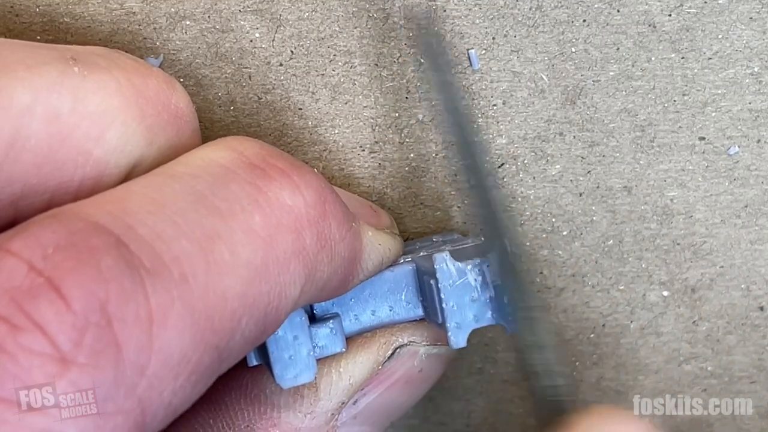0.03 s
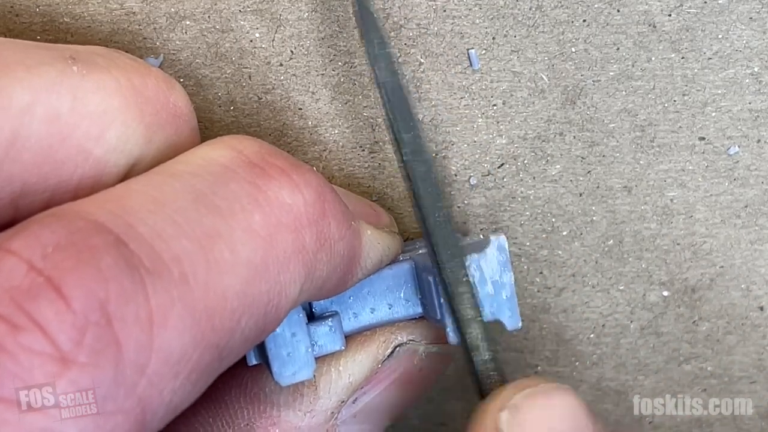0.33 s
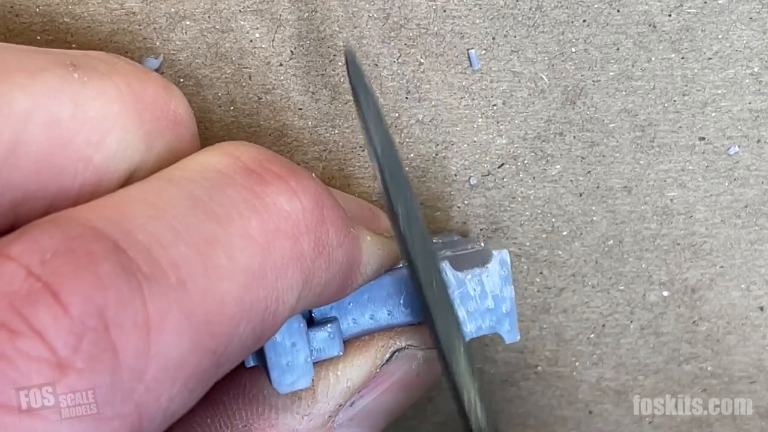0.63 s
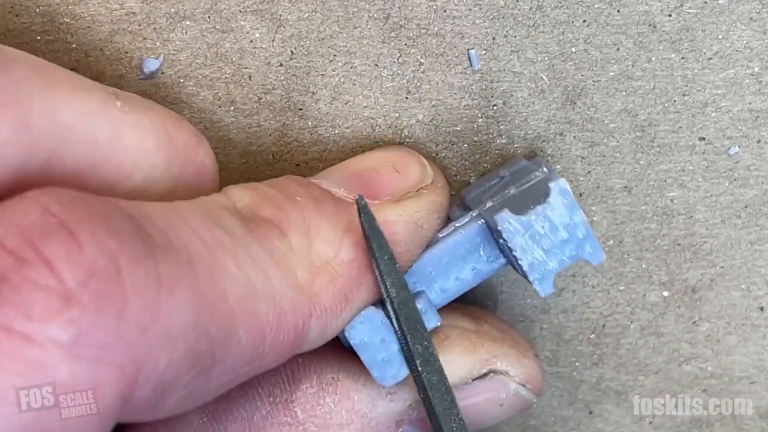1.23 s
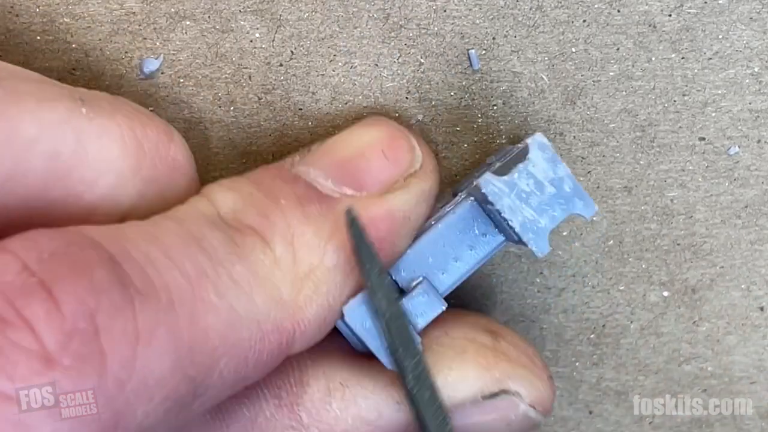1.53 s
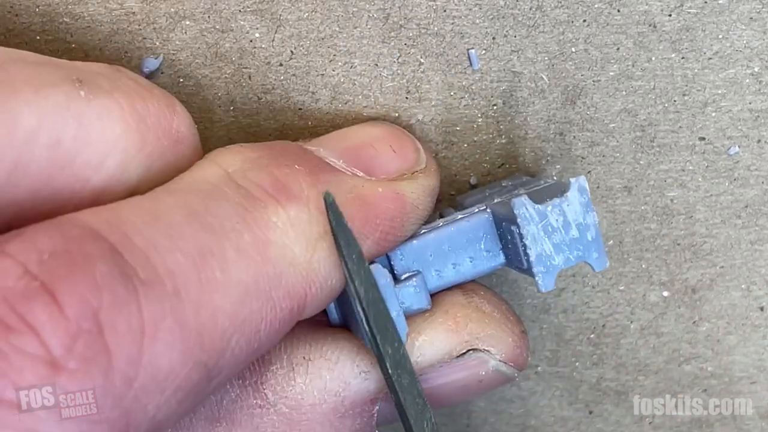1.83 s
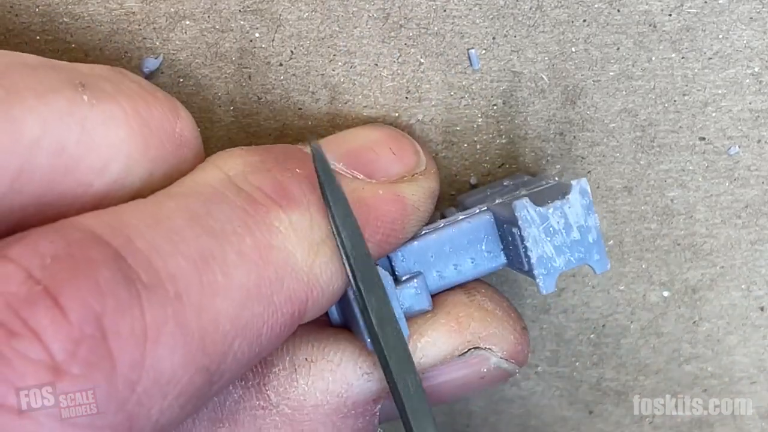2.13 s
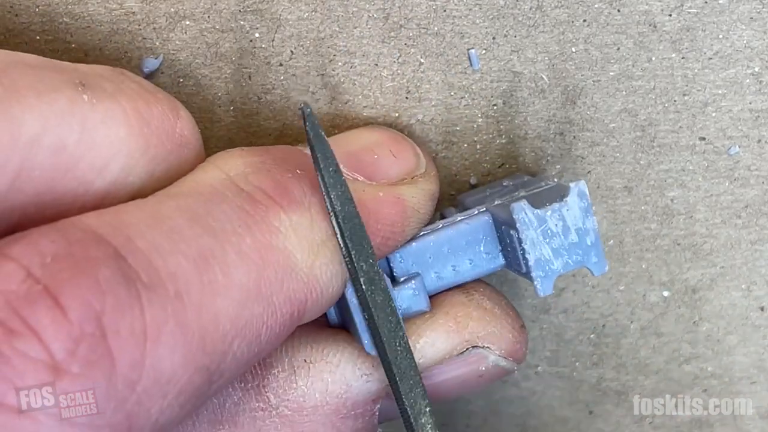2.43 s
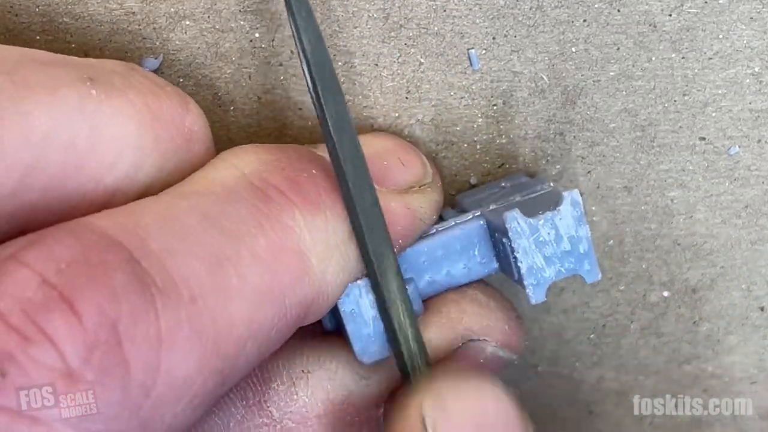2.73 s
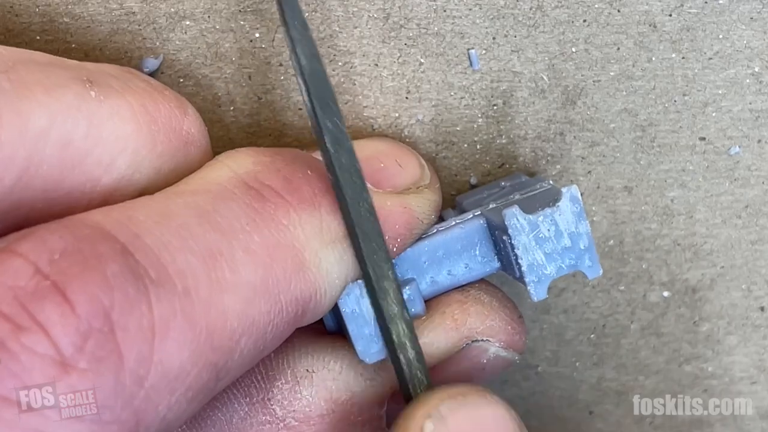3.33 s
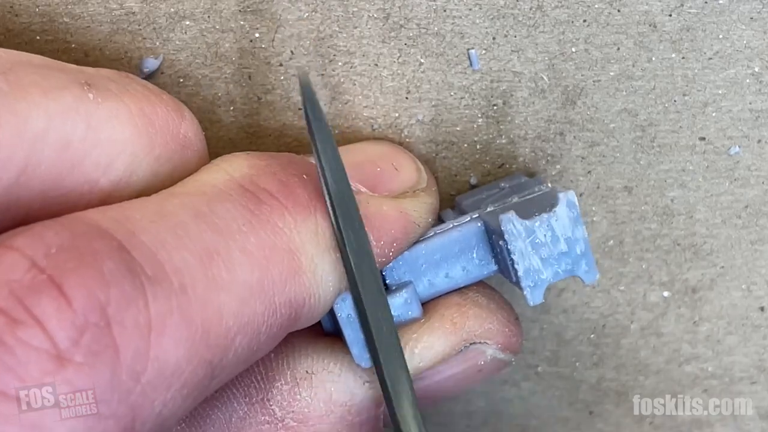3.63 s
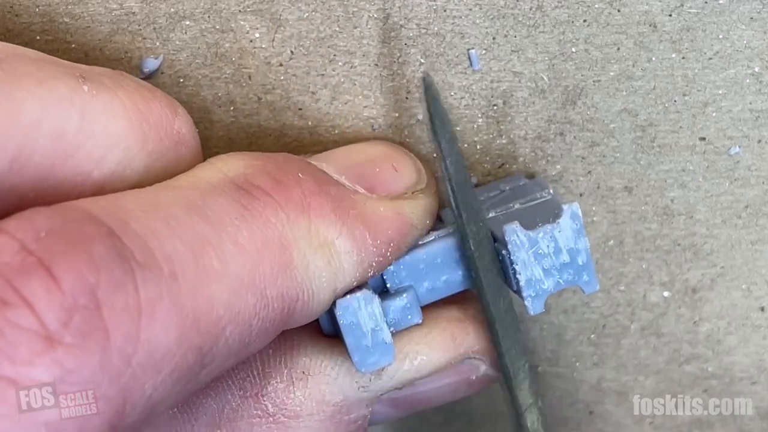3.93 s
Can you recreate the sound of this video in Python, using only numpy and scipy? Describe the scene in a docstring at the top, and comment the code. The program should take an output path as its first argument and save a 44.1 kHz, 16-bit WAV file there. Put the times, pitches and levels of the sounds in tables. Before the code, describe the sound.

A small metal file scrapes a plastic model part in short, uneven strokes.

```python
"""A small steel file scrapes to and fro over a plastic model part pinched between fingers.
Its teeth pick at the edge: a bright rasp, the hollow ring of part and file, a soft thud in the hand.
The file knocks as it lands or snags, and on some strokes it sticks and slips in a short croak.
Heard in a quiet room, close to a stereo microphone, with a low rumble from the fingers underneath."""
import sys
import numpy as np
from scipy import signal
from scipy.fft import rfft, irfft
from scipy.io import wavfile
from scipy.ndimage import uniform_filter1d

SR = 44100
rng = np.random.default_rng(int(sys.argv[2]) if len(sys.argv) > 2 else 0)


def pcm_store(signal):
    """Save signal as 16-bit PCM."""
    levels = np.round(np.clip(np.atleast_2d(signal), -1, 1) * 32767)
    wavfile.write(sys.argv[1], SR, levels.astype(np.int16).T)


N = 176400
TIME = np.arange(N) / SR


def from_db(db):
    """Decibels to gain."""
    return 10 ** (np.asarray(db) / 20)


def unit_rms(x):
    """Scale to unit power."""
    return x / np.sqrt(np.mean(x ** 2) + 1e-20)


def drift(rate_hz):
    """A smooth random wander with a spread of about 1."""
    pole = np.exp(-2 * np.pi * rate_hz / SR)
    return unit_rms(signal.lfilter([1], [1, -2 * pole, pole * pole], rng.standard_normal(N + SR))[SR:])


def response(colour, size=8192):
    """Minimum-phase impulse response of unit energy: a colour sets tone, not loudness."""
    hz, db = np.transpose(colour)
    grid_hz = np.maximum(np.arange(size // 2 + 1) * SR / size, 1)
    cepstrum = irfft(np.log(from_db(np.interp(np.log(grid_hz), np.log(hz), db))))
    cepstrum[1:size // 2] *= 2
    cepstrum[size // 2 + 1:] = 0
    impulse = irfft(np.exp(rfft(cepstrum)))
    return impulse / np.linalg.norm(impulse)


def through(force, impulse):
    """Pass a force through an impulse response."""
    return signal.fftconvolve(force, impulse)[:N]


def contact(start, end, attack_s=0.0018, release_s=0.01):
    """Envelope of a touch: the file eases in, stays and lifts off."""
    onset = (1 + np.tanh((TIME - start) / (2 * attack_s))) / 2
    return onset * np.exp(-np.maximum(TIME - end, 0) / release_s)


def pulses(rate_hz, jitter):
    """Unit clicks at a changing rate, each gap a little uneven."""
    cycles = np.cumsum(rate_hz) / SR
    marks = np.cumsum(np.exp(jitter * rng.standard_normal(N // 4)))
    clicks = np.zeros(N)
    clicks[np.searchsorted(cycles, marks[marks < cycles[-1]])] = 1
    return clicks


# Background of the quiet room: frequency_hz, level_db
FLOOR_COLOUR = [(20, -6.5), (150, -5), (330, -22), (1500, -33.5), (3000, -42), (9000, -37.5),
                (13000, -71.5)]

def noise_floor(level_db=-65.5):
    """Steady low noise with a trace of hiss."""
    return from_db(level_db) * through(rng.standard_normal(N), response(FLOOR_COLOUR))


# Flesh of the hand, heard from close by: frequency_hz, level_db
RUMBLE_COLOUR = [(20, -34.5), (32, -23.5), (50, -1.5), (72, -8), (100, -13.5), (1000, -69)]

def finger_rumble(force, shake_db=-4.5, hold_s=0.021, rest_db=-71.5):
    """The fingers rumble faintly at rest and go on shaking after each push."""
    pole = np.exp(-1 / (hold_s * SR))
    shake = np.sqrt(signal.lfilter([1 - pole], [1, -pole], force ** 2))
    level = from_db(shake_db) * shake + from_db(rest_db)
    return through(rng.standard_normal(N) * level, response(RUMBLE_COLOUR))


# The file lands or snags: start_s, rasp_db, body_db, hand_db
FILE_KNOCKS = [(0.045, -20.5, -5, -5.5), (0.301, -19, -21, -10), (.327, -25, -37, -12),
               (0.358, -24, -17, -17), (0.646, -25, -6.5, -13), (.693, -23, -12, -2),
               (.758, -14.5, -7.5, -5), (1.199, -34.5, -28, -20.5), (1.756, -38.5, -25.5, -16.5),
               (2.277, -31, -14, -9), (2.292, -53.5, -42, -8.5), (2.512, -38, -15.5, -22.5),
               (3.931, -23.5, -17.5, -20.5), (3.961, -45, -17, -16.5)]

def knocks(crunch_s=0.005, crunch_share=0.98):
    """A sharp blow, then the edge briefly crumbles; gives the forces for rasp, body and hand."""
    forces = np.zeros((3, N + SR))
    t = TIME[:SR // 20]
    for start, *levels_db in FILE_KNOCKS:
        crunch = rng.standard_normal(len(t)) * np.exp(-t / crunch_s)
        blow = crunch_share * crunch / np.linalg.norm(crunch)
        blow[0] += 1
        at = int(start * SR)
        forces[:, at:at + len(t)] += from_db(levels_db)[:, None] * blow / np.linalg.norm(blow)
    return forces[:, :N]


# Steel teeth on the plastic edge, close up: frequency_hz, level_db
RASP_COLOUR = [(500, -14.5), (1500, 1.5), (2400, 1.5), (2900, -5.5), (4300, 0.5), (5400, -3.5), (7900, 3.5),
               (9100, 3.5), (10100, 8), (10800, -5), (11700, -26.5), (13000, -49), (16000, -66.5)]

def rasp(force, sizzle_hz=11000, sizzle_db=-12.5, hard_bite_db=-35):
    """A bright scrape; the harder the teeth bite, the more high sizzle it gains."""
    bite = np.sqrt(np.abs(uniform_filter1d(force ** 2, size=300))) / from_db(hard_bite_db)
    band = signal.butter(2, [sizzle_hz / 1.12, sizzle_hz * 1.12], "band", fs=SR, output="sos")
    sizzle = signal.sosfilt(np.vstack([band, band]), force * np.tanh(bite))
    return through(force, response(RASP_COLOUR)) + from_db(sizzle_db) * sizzle


# Clack of the plastic body: frequency_hz, level_db
BODY_COLOUR = [(100, -19), (300, -0.5), (450, 3), (545, -5), (650, -0.5), (900, -4.5), (1050, -8),
               (2200, -12), (2800, -21.5), (5000, -22), (12000, -57)]
# Modes of part and file: pitch_hz, lift_db, width_hz
PART_MODES = [(680.2, 6, 12), (744, 0.5, 4.1), (895, 5.5, 11), (1273, 9.5, 18), (1559, 9.5, 75),
              (1825, 4.5, 65)]

def part_response():
    """Impulse response of a dead plastic clack, lifted at the modes of part and file, which ring on."""
    clack = response(BODY_COLOUR)
    for pitch_hz, lift_db, width_hz in PART_MODES:
        ring = signal.lfilter(*signal.iirpeak(pitch_hz, pitch_hz / width_hz, fs=SR), clack)
        clack = clack + (from_db(lift_db) - 1) * ring
    return clack / np.linalg.norm(clack)


# The hand that pinches the part: frequency_hz, level_db
HAND_COLOUR = [(20, -26), (52, -11), (90, -17), (145, 0.5), (175, -1), (202, 6), (238, -9.5), (305, 1.5),
               (420, -14), (3000, -79.5)]

def hand_thud(force):
    """The hand takes each push of the file with a soft, low thud."""
    return through(force, response(HAND_COLOUR))


def arch(start, crest, end, swell_db, fade_db=8):
    """Pressure swells to a rounded crest and falls away; a negative swell starts above the crest."""
    to_crest = np.interp(TIME, [start, crest], [1, 0])
    past_crest = np.interp(TIME, [crest, end], [0, 1])
    return from_db(-swell_db * to_crest ** 2 - fade_db * past_crest ** 2)


# Passes of the file: start_s, crest_s, end_s, rasp_db, body_db, hand_db, swell_db
FILE_STROKES = [(0.07, 0.187, 0.17, -63.5, -46.5, -43, 12.5), (0.229, 0.297, 0.31, -43.5, -36.5, -36, 6.5),
                (0.354, .385, 0.43, -51, -46, -49.5, 3), (0.474, 0.552, 0.54, -44, -42, -41.5, 1),
                (0.582, 0.648, 0.65, -42, -39, -42.5, 8.5), (0.694, 0.734, 0.74, -35.5, -40, -42.5, 8.5),
                (0.785, 0.813, .828, -48, -40.5, -64, 7), (0.831, 0.915, 0.95, -63.5, -64.5, -42, 21),
                (0.944, 1.014, 1.09, -55, -60, -52, 5), (1.112, 1.158, 1.26, -70.5, -77, -68, 4),
                (1.248, 1.295, 1.283, -83, -69, -52, 9), (1.347, 1.358, 1.48, -75.5, -82.5, -65, 1.5),
                (1.55, 1.611, 1.653, -65.5, -70.5, -57.5, -3.5),
                (1.662, 1.79, 1.833, -72.5, -65.5, -52.5, 14), (1.861, 1.867, 1.902, -54, -44, -43.5, -2),
                (1.909, 1.961, 2.011, -54, -45.5, -40, 9), (2.063, 2.123, 2.154, -56, -50, -48.5, 5),
                (2.19, 2.273, 2.3, -48, -44, -44.5, 8), (2.33, 2.331, 2.415, -53.5, -50, -52.5, 0),
                (2.446, 2.532, 2.549, -43, -37, -37.5, 20.5),
                (2.591, 2.615, 2.675, -53.5, -49.5, -50.5, -2), (2.697, 2.74, 2.756, -49, -45.5, -41, 13),
                (2.8, 2.855, 2.886, -56, -48, -51, 12), (2.937, 2.957, 2.972, -57, -49, -46, 12),
                (3.082, 3.099, 3.135, -79, -67, -57, 0), (3.248, 3.275, 3.322, -68, -55, -49, 2),
                (3.334, 3.368, 3.43, -51, -50, -54, 6), (3.463, 3.495, 3.536, -47.5, -45, -47.5, 9),
                (3.565, 3.614, 3.69, -53, -52, -53, 7), (3.68, 3.691, 3.71, -50, -48.5, -47, 14),
                (3.759, 3.786, 3.95, -66, -68, -64.5, -8.5), (3.933, 3.968, 4.11, -63.5, -57.5, -50.5, -1)]

def strokes(teeth_per_s=1150, tooth_spread_db=5.5, judder_db=1.5, judder_hz=53):
    """Teeth pick at the edge, fastest in mid-stroke; gives the forces for rasp, body and hand."""
    pressure, speed = np.zeros((3, N)), np.full(N, .5)
    for start, crest, end, *levels_db, swell_db in FILE_STROKES:
        shape = contact(start, end) * arch(start, crest, end, swell_db)
        pressure += from_db(levels_db)[:, None] * shape
        speed += np.sin(np.pi * np.clip((TIME - start) / (end - start), 0, 1)) / 2
    teeth = pulses(teeth_per_s * speed, jitter=.4)
    teeth *= from_db(tooth_spread_db * np.clip(rng.standard_normal(N), -2, 2))
    teeth = unit_rms(teeth - uniform_filter1d(teeth, size=200))   # take out the steady push
    fine_friction = rng.standard_normal(N)
    judder = from_db(judder_db * drift(judder_hz))   # uneven pressure
    return pressure * unit_rms((teeth + fine_friction) * judder)


# A tooth or an edge catches and lets go: start_s, level_db
TOOTH_CATCHES = [(.158, -30.5), (.243, -20.5), (.478, -18), (.486, -17), (.646, -16), (.651, -15),
                 (.690, -14.5), (1.349, -40.5), (1.639, -39)]
# Its bright tick: frequency_hz, level_db
CATCH_COLOUR = [(1000, -18.5), (4000, 5.5), (11000, 1), (16000, -20)]

def catches(snap_s=0.00099):
    """A chip snaps off in about a millisecond."""
    force, t = np.zeros(N), TIME[:SR // 100]
    for start, level_db in TOOTH_CATCHES:
        snap = rng.standard_normal(len(t)) * np.exp(-t / snap_s)
        at = int(start * SR)
        force[at:at + len(t)] += from_db(level_db) * snap / np.linalg.norm(snap)
    return through(force, response(CATCH_COLOUR))


# The file sticks and slips, and once, near 3.24 s, the fingers slip on the plastic: start_s, end_s,
# start_pitch_hz, level_db
SLIP_CROAKS = [(0.26, 0.302, 876.6, -35), (0.482, .53, 849.5, -38), (0.691, 0.711, 799, -23),
               (0.726, 0.762, 752.4, -35), (3.244, 3.258, 699, -51)]

def croaks(part, sag_hz_per_s=1500, wobble_depth=.06, slip_top_hz=1570):
    """Near-regular slips, softer than tooth clicks and sagging in pitch, drive the part."""
    sound = np.zeros(N)
    wobble = np.exp(wobble_depth * drift(rate_hz=60))
    soften = signal.butter(2, slip_top_hz, fs=SR, output="sos")
    for start, end, start_pitch_hz, level_db in SLIP_CROAKS:
        pitch_hz = start_pitch_hz - sag_hz_per_s * np.clip(TIME - start, 0, end - start)
        slips = pulses(pitch_hz * wobble, jitter=.1)
        slips = signal.sosfilt(soften, slips - slips.mean())
        croak = through(slips * contact(start, end), part)
        sound += from_db(level_db) * croak * np.sqrt((end - start) * SR) / np.linalg.norm(croak)
    return sound


def gliding_ring(force, pitch_hz, q, block=128):
    """A resonance whose centre moves."""
    ring, state = np.zeros(N), np.zeros(2)
    for i in range(0, N, block):
        peak = signal.iirpeak(pitch_hz[i], q, fs=SR)
        ring[i:i + block], state = signal.lfilter(*peak, force[i:i + block], zi=state)
    return ring


# Light strokes on which the file rings hollow: start_s, end_s, mid_pitch_hz, gain_db
HOLLOW_STROKES = [(2.064, 2.14, 1720, 8), (2.329, 2.412, 1620, 10), (2.591, 2.672, 1500, 8),
                  (2.835, 2.886, 1560, 10), (3.332, 3.432, 1820, 6), (3.461, 3.654, 1640, 6)]

def file_ring(force, q=9, sag_hz_per_s=2000, upper_mode_ratio=1.24):
    """The contact travels along the file, so the ring of two bending modes sags through a stroke."""
    pitch_hz, drive = np.full(N, float(HOLLOW_STROKES[0][2])), np.zeros(N)
    for start, end, mid_pitch_hz, gain_db in HOLLOW_STROKES:
        from_middle_s = np.clip(TIME, start, end) - (start + end) / 2
        pitch_hz = np.where(TIME >= start, mid_pitch_hz - sag_hz_per_s * from_middle_s, pitch_hz)
        drive += from_db(gain_db) * contact(start, end) * force
    return gliding_ring(drive, pitch_hz, q) - gliding_ring(drive, pitch_hz * upper_mode_ratio, q) / 2


def room_tail(sound, t60_s=0.43, level_db=-22.5, top_hz=4000):
    """The room answers with a dull tail, faint at this distance and different on each side."""
    t = TIME[:SR // 2]
    dull = signal.butter(2, top_hz, fs=SR, output="sos")
    tails = signal.sosfilt(dull, rng.standard_normal((2, len(t))))
    tails *= from_db(-60 * t / t60_s) * (t > .004)   # reflections begin after 4 ms
    return from_db(level_db) * np.array([through(sound, tail / np.linalg.norm(tail)) for tail in tails])


# Phase by which the left microphone port leads the right: frequency_hz, lead_rad
PORT_LEAD = [(0, 0), (400, -.1), (900, -.5), (1200, -.1), (1800, .1), (2700, .75), (4100, .75), (4570, 1.7),
             (4900, 3.4), (5500, 6.1), (6200, 6.3), (8700, 9.2), (9700, 9.8), (10700, 10.9), (11600, 12.4)]

def microphone_ports(sound):
    """The two ports hear the close sound at the same level but with different phase."""
    frequency_hz = np.arange(N + 1) * SR / (2 * N)
    lead_rad = np.interp(frequency_hz, *np.transpose(PORT_LEAD))
    right = irfft(rfft(sound, 2 * N) * np.exp(-1j * lead_rad))[:N]
    return np.array([sound, right])


def scene():
    """Filing and finger rumble close to the microphone, with the quiet room behind."""
    rasp_force, body_force, hand_force = strokes() + knocks()
    part = part_response()
    teeth = rasp(rasp_force) + catches()
    body = through(body_force, part) + croaks(part) + file_ring(body_force)
    filing = teeth + body + hand_thud(hand_force)
    return microphone_ports(filing + noise_floor() + finger_rumble(hand_force)) + room_tail(filing)


def record(dry, cutoff_hz=16200):
    """A steep low-pass cuts the highest treble."""
    return signal.sosfilt(signal.cheby2(12, 70, cutoff_hz, fs=SR, output="sos"), dry)


dry = scene()
out = record(dry)
pcm_store(out)
```